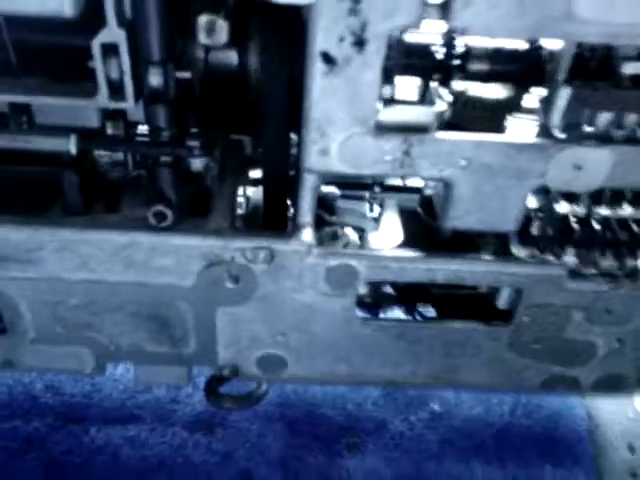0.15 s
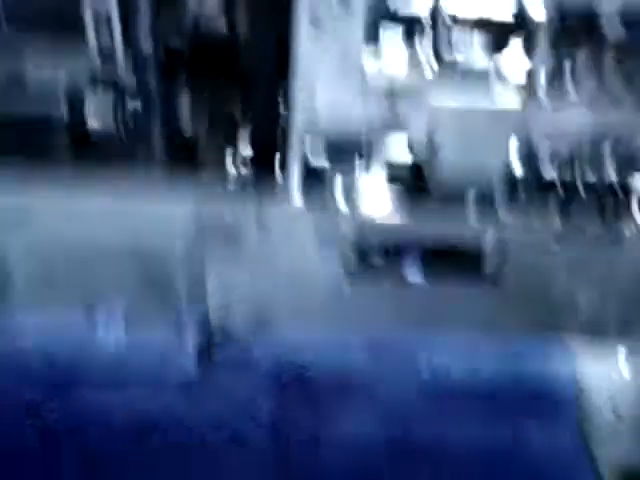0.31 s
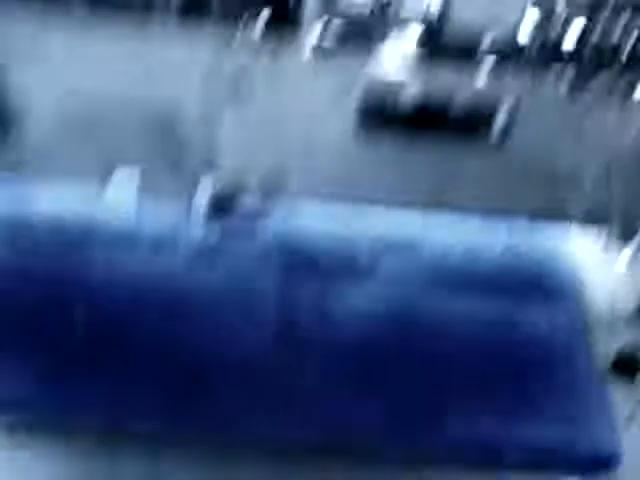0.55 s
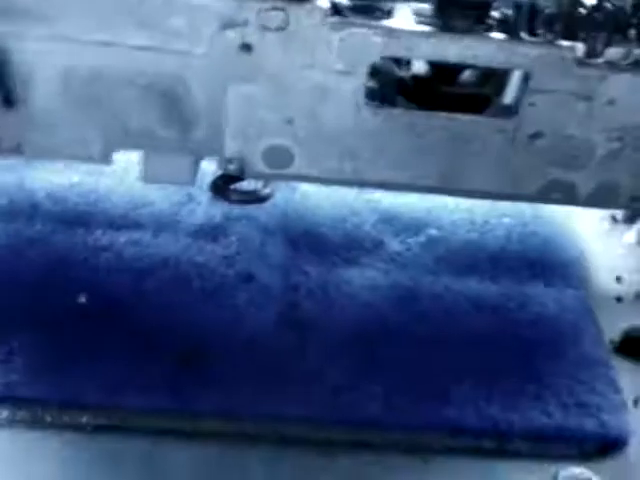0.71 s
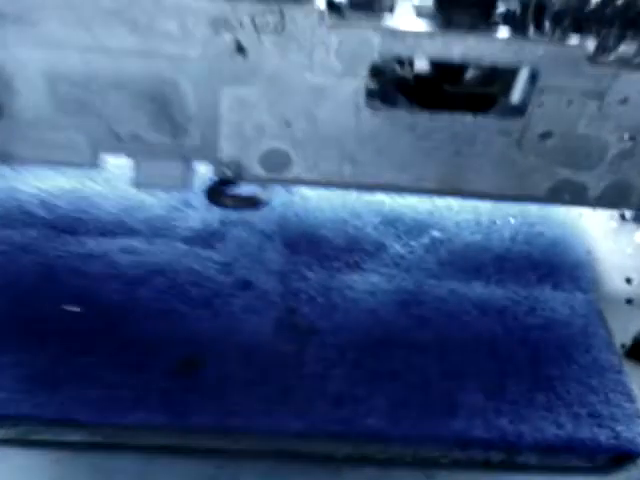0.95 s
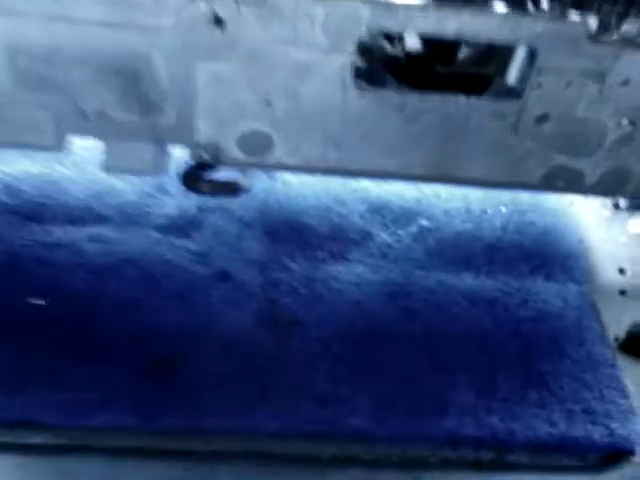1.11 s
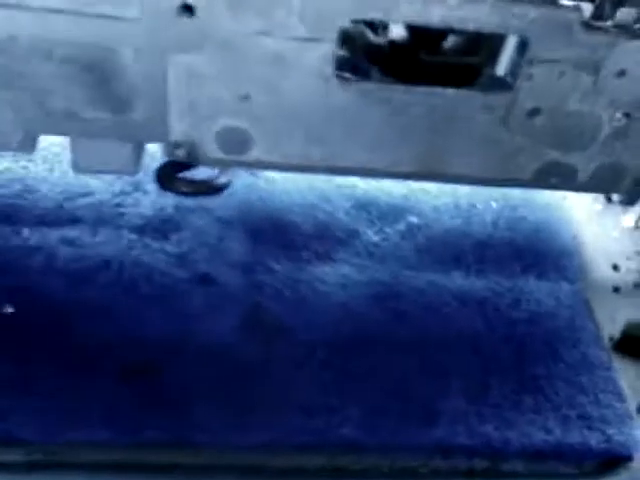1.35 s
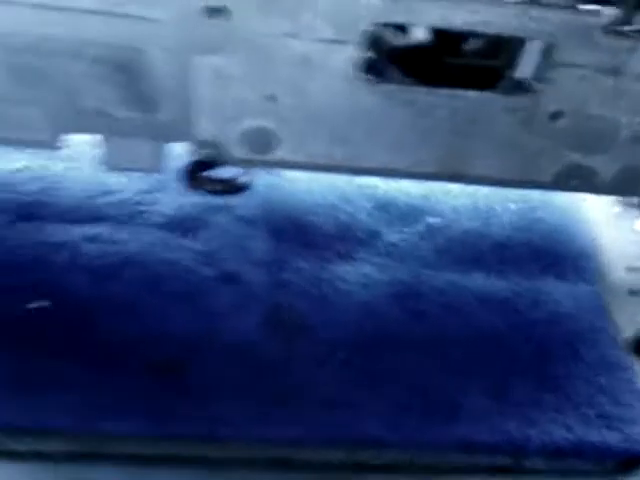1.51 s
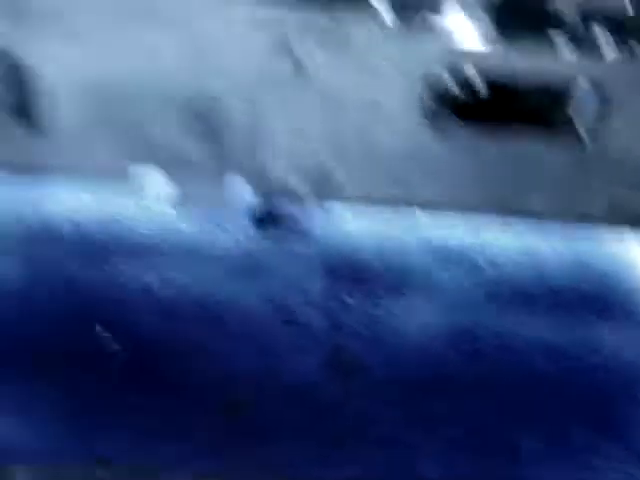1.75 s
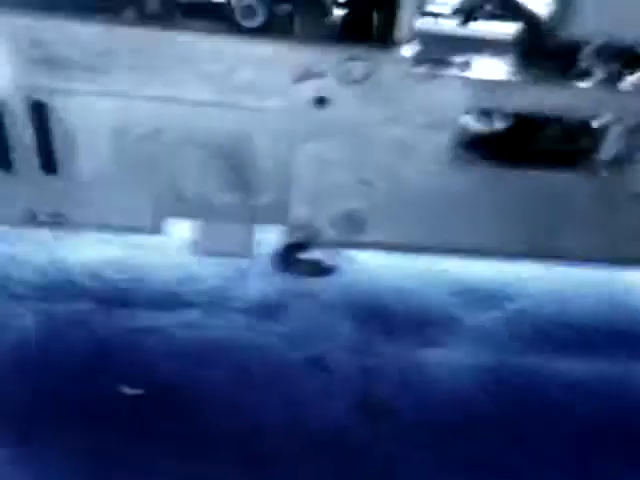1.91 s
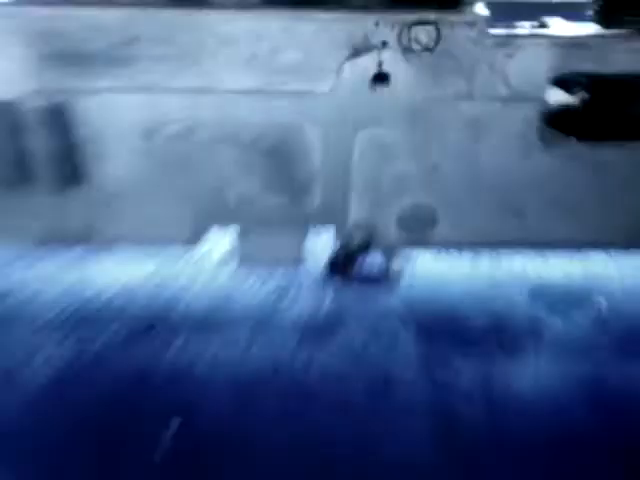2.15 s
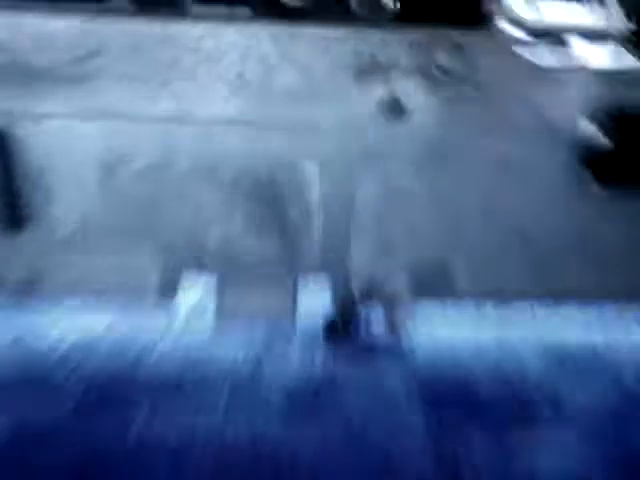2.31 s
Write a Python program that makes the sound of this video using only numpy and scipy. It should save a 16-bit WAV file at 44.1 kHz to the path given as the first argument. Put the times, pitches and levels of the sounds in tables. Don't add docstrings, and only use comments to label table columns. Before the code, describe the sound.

Electric typewriter switched on: a sharp double metal clack, then faint motor hum and light clicks

```python
import sys
import numpy as np
from scipy import signal
from scipy.fft import rfft, irfft, next_fast_len
from scipy.io import wavfile
from scipy.ndimage import map_coordinates

SR = 44100
rng = np.random.default_rng(int(sys.argv[2]) if len(sys.argv) > 2 else 0)


def wav_record(signal):
    frames = np.transpose(np.atleast_2d(signal))
    bounded = np.clip(frames, -1, 1)
    quanta = np.round(bounded * 32767).astype(np.int16)
    wavfile.write(sys.argv[1], SR, quanta)


def gain_from_db(level_db):
    decades = np.asarray(level_db, float) / 20
    return 10 ** decades


N = 105354

# [t/s, level/dB]
RATTLE = [(0, -34.5), (.04, -33.5), (.07, -35), (.085, -41), (.1, -36), (.14, -40.5), (.17, -52),
          (.26, -57.5), (.33, -77)]
# [t/s, level/dB, contact time/s]
BLOWS = [
    (0.0442, -34.5, 0.004),
    (.0475, -34.5, 0.0092),
    (.059, -44, 0.0035),
    (0.1073, -32.5, .004),
    (0.115, -35, 0.0027),
    (.126, -40.5, .004),
]
# [f/Hz, level/dB, t60/s: each fades by 60 dB in about 0.37 of it]
STEEL_TONES = [(312, -4, 0.45), (890, 15.5, 0.14), (1160, -17.5, 0.51), (1352, -12, 0.15), (1550, -4, 0.27),
               (2370, -13.5, 0.17), (2400, -1, 0.033), (2805, -15, 0.16), (2977, -17.5, 0.37),
               (3550, 7.5, 0.15), (3806, -20.5, 0.21), (4640, -13, 0.066), (4930, -7.5, 0.098),
               (6858, -22.5, 0.2)]
# [f/Hz, level per Hz/dB]
RATTLE_COLOUR = [(53, -33.5), (90, -3.5), (244, -6.5), (299, 0.5), (580, -12.5), (1570, 1), (2030, -7.5),
                 (3350, -8), (7400, -13), (9620, -33.5), (16300, -120)]
# [t/s, length/s]
SLIP_TIMES = [(.225, .02), (.428, .01), (.4615, .007), (.474, .022), (1.073, .007), (1.0805, .013),
              (1.1, .01), (1.118, .004),
              (1.2315, .008), (1.24, .008), (1.25, .03), (1.28, .011), (1.33, .005), (1.3355, .005),
              (1.342, .014), (1.362, .03), (1.5905, .006), (1.6, .007), (1.62, .03)]
# [level/dB, brightness/dB per octave]
SLIP_SOUNDS = [(-47.5, -2.5), (-64, -4), (-50, -0.6), (-60, 1), (-55, -4), (-47, 1), (-50.5, -5.5),
               (-51.5, -2), (-41.5, 3), (-40, -0.5), (-56.5, -6), (-54, -1), (-44, 0.5), (-46.5, -4.5),
               (-46, 0), (-58.5, -6.5), (-46.5, 1.5), (-50, 2.5), (-64.5, -2.5)]
# [f/Hz, level per Hz/dB]
SLIP_COLOUR = [(290, -26), (500, 7), (2840, -1.5), (3360, -1), (3850, -2), (4770, -1.5), (5910, -4),
               (7400, -5), (9620, -31), (16300, -120)]
# [t/s, peak level/dB,
# f/Hz, width/Hz]
TICKS = [(.017, -33, 1100, 600), (.031, -26, 3200, 900), (.052, -24, 4600, 900), (0.0548, -28.5, 1600, 600),
         (0.095, -27.5, 3200, 1500), (0.0479, -22.5, 1930, 1500), (.108, -19, 1550, 450),
         (0.1113, -26, 1500, 600), (.1165, -26, 3030, 2500), (.127, -25.5, 1260, 600),
         (0.2116, -43, 2980, 2530), (0.2364, -30.5, 4830, 2940), (.338, -54, 6000, 2500),
         (.437, -53, 3000, 3020), (.452, -56, 6340, 1500), (0.488, -61, 350, 250), (0.7465, -50, 398, 200),
         (0.889, -58.5, 4570, 1300), (.889, -62, 2800, 1500), (1.081, -38.5, 6440, 2500),
         (1.0831, -43.5, 2000, 900), (1.0862, -42.5, 1200, 400), (1.0885, -42.5, 980, 250),
         (1.11, -57.5, 550, 70), (1.089, -43.5, 3000, 700), (1.0905, -41, 4100, 1200),
         (1.093, -44, 1300, 900), (1.119, -50, 3800, 900), (1.161, -58, 6300, 1500),
         (1.2408, -33.5, 4870, 1200), (1.2415, -37, 700, 1200), (1.2472, -39.5, 2500, 3500),
         (1.3357, -33.5, 810, 1300), (1.3625, -48.5, 900, 500), (1.3413, -29, 5130, 3000),
         (1.431, -52.5, 6600, 1100), (1.4515, -50, 2500, 5000), (1.538, -68, 6600, 1070),
         (1.562, -66, 4000, 3000), (1.596, -43, 1280, 900), (1.84, -60.5, 4800, 3500),
         (1.866, -52, 2500, 4000), (1.987, -64.5, 6000, 1800)]
THUD_TIMES = [0, .048, .05, .055, .108, .23, .486, .5, .58, .746, 1.1, 1.14, 1.2455, 1.2505, 1.281, 1.315,
              1.34, 1.37, 1.398, 1.445, 1.585, 1.602]
# [peak level/dB, f/Hz, t60/s, pitch sag/share of f]
THUD_SOUNDS = [(-38.5, 165, 0.22, .2), (-40, 161, 0.49, 0.19), (-40, 178, 0.22, .2), (-50, 120, 0.45, 0.16),
               (-39, 308, 0.27, 0.023), (-51, 148, 0.52, .2), (-47, 270, 0.051, 0.31),
               (-54.5, 170, .12, .1), (-63, 310, .1, .2), (-51.5, 290, .15, .35), (-68, 54, 0.88, .2),
               (-57, 265, .25, .05), (-37, 125, 0.23, 0.64), (-45, 270, 0.22, 0.12), (-48.5, 190, .1, .2),
               (-46.5, 215, 0.16, 0.042), (-53.5, 370, 0.25, .02), (-52.5, 196, .12, .1),
               (-49, 175, 0.16, 0.041), (-52, 190, 0.11, .1), (-53.5, 280, .1, .02), (-47, 133, 0.073, .2)]
# [f/Hz, level/dB, t60/s]
LEVER_TONES = [(1080, -6, .18), (1780, -1, .2), (2137, -0.5, 0.35), (2482, -3, 0.43), (3350, -1, .25),
               (4640, -3, .1), (5265, -5, .1), (6700, 5, .12)]
# [t/s, level/dB]
LEVER_STRIKES = [
    (1.2405, -57),
    (1.3412, -67.5),
    (1.088, -67),
]
# [t/s, level/dB]
MOTOR_NEARNESS = [(0.3, -69), (1.28, -69.5), (1.58, -70.5), (2.01, -70), (2.23, -70.5), (2.39, -72.5)]
# [t/s, level/dB]
HUM_SWELL = [(0.2, -66), (0.23, -56.5), (0.36, -66), (0.4, -59.5), (0.49, -66), (0.52, -55.5),
             (0.63, -65.5), (0.78, -57.5), (0.8, -63), (1.06, -62), (1.2, -55.5), (1.24, -66), (1.29, -53),
             (1.52, -68.5), (1.61, -57), (1.69, -62.5), (2.36, -61), (2.39, -64)]
# [f/Hz, rms level/dB]
WHINE_TONES = [(279.9, -75), (602.9, -78), (877.5, -82.5), (1093, -74), (1174, -71), (1250, -73.5),
               (1295, -77), (1362, -92.5), (1523, -83.5), (2008, -90)]
# [f/Hz, width/Hz, level/dB]
HOUSING = [(296, 193, 2.5), (582, 43, -8), (800, 66, -4.5), (1256, 366, -5), (2016, 380, -7.5)]
# [f/Hz, level per Hz/dB]
AIR_COLOUR = [(15, -75.5), (25, -37), (95, -21), (123, -12), (146, -13.5), (319, -24.5), (607, -28),
              (1180, -29.5), (1610, -30.5), (7400, -51), (9620, -98.5), (16300, -120)]
# [t/s, level/dB]
RUSTLE = [(1.05, -95), (1.12, -73.5), (1.4, -92), (1.7, -82.5), (2.05, -92), (2.22, -77.5), (2.39, -81.5)]
# [f/Hz, level per Hz/dB]
CLOTH_COLOUR = [(500, -20), (1800, -10), (3200, 0), (4800, -10), (7400, -26)]
# [f/Hz, t60/s]
ROOM_FADE = [(200, 0.65), (1500, 0.073), (4000, 0.28), (7000, 0.27)]
# [f/Hz, level/dB]
CAMERA_COLOUR = [(20, -2), (70, -0.5), (5000, -2), (6000, -6.5), (6900, 0), (7400, -5.5), (7700, -16.5),
                 (8000, -42), (8250, -23.5), (8600, -9.5), (9300, -60.5), (10000, -110)]


def unit(x):
    return x / np.sqrt(np.mean(x ** 2) + 1e-20)


def along(points, hz):
    f, v = np.transpose(points)
    return np.interp(np.log(hz + 1), np.log(f + 1), v)


def curve(rows):
    s, v = np.transpose(rows)
    return np.interp(np.arange(N) / SR, s, v)


def wobble(rate):
    knots = rng.standard_normal(int(N * rate / SR) + 4)
    return map_coordinates(knots, [np.arange(N) * rate / SR])


def filtered(x, response):
    m = next_fast_len(len(x) + 8192)
    return irfft(rfft(x, m) * response(np.fft.rfftfreq(m, 1 / SR)), m)[:len(x)]


def coloured_noise(colour):
    return unit(filtered(rng.standard_normal(N), lambda f: gain_from_db(along(colour, f))))


def peak(f, hz, width):
    return 1j * f * width / (hz * hz - f * f + 1j * f * width)


def chatter(size, rate, spike_db):
    strengths = gain_from_db(spike_db * np.clip(rng.standard_normal(size + 1), -2, 2))
    contact = (np.arange(size) * rate / SR).astype(int)
    return unit(strengths[contact] * rng.standard_normal(size))


def add(track, s, sound):
    part = track[round(s * SR):][:len(sound)]
    part += sound[:len(part)]


def room_air():
    return gain_from_db(-66.5) * coloured_noise(AIR_COLOUR)


def sleeve_rustle():
    level_db = curve(RUSTLE) + 1.5 * wobble(25)
    return gain_from_db(level_db) * coloured_noise(CLOTH_COLOUR)


def room_echo(x):
    out = np.zeros(N)
    step = SR // 10
    for start in range(0, N, step):
        hz, t, z = signal.stft(rng.standard_normal(SR // 2), SR, nperseg=256)
        fade = gain_from_db(-60 * t / along(ROOM_FADE, hz)[:, None])
        tail = signal.istft(z * fade, SR, nperseg=256)[1]
        echo = signal.fftconvolve(x[start:start + step], tail / np.linalg.norm(tail))
        add(out, start / SR + .004, echo)
    return out


def case_thuds():
    attack_s, sag_s, roughness = .003, .035, .15
    out, t = np.zeros(N), np.arange(SR // 2) / SR
    for s, (db, hz, t60, sag) in zip(THUD_TIMES, THUD_SOUNDS):
        pitch = hz * (1 + sag * np.exp(-t / sag_s))
        tone = np.sin(2 * np.pi * np.cumsum(pitch) / SR)
        noise = rng.standard_normal(len(t))
        rough = unit(filtered(noise, lambda f: peak(f, 1.5 * hz, .8 * hz) ** 2))
        envelope = gain_from_db(db - 60 * t / t60) * (1 - np.exp(-t / attack_s))
        add(out, s, envelope * (tone + roughness * rough))
    return out


def lever():
    out, t = np.zeros(N), np.arange(SR // 2) / SR
    for s, db in LEVER_STRIKES:
        for hz, level, t60 in LEVER_TONES:
            envelope = gain_from_db(db + level + rng.normal(0, 1.5) - 60 * t / t60)
            add(out, s, envelope * np.sin(2 * np.pi * hz * t))
    return out


def ticks():
    grit_s, grit_level = .0015, .2
    out, t = np.zeros(N), np.arange(SR // 20) / SR
    for s, db, hz, width in TICKS:
        grit = grit_level * rng.standard_normal(len(t)) * np.exp(-t / grit_s)
        crack = (t == 0) + grit
        sound = filtered(crack, lambda f: peak(f, hz, width) ** 2)
        add(out, s, gain_from_db(db) * sound / np.abs(sound).max())
    return out


def slips():
    release_s, sag_db = .004, 5
    out, t = np.zeros(N), np.arange(SR // 10) / SR
    for (s, length), (db, bright) in zip(SLIP_TIMES, SLIP_SOUNDS):
        def colour(f):
            tilt = ((f + 50) / 3000) ** (bright / 6)
            low_cut = (f / (f + 700)) ** 2
            return gain_from_db(along(SLIP_COLOUR, f)) * tilt * low_cut

        sound = filtered(chatter(len(t), 1500, 1.5), colour)
        sound /= np.std(sound[t < length])
        release = np.exp(-np.maximum(t - length, 0) / release_s)
        add(out, s, gain_from_db(db - sag_db * t / length) * sound * release)
    return out


def motor():
    hum_hz, hum_drift_hz = 119.9, 0.59
    whine_width_hz, whine_sway_db = 22, 2.5
    whirr_db, whirr_pulse, whirr_patchy_db = -65.5, 0.28, 1
    pulse = np.sin(2 * np.pi * np.cumsum(hum_hz + hum_drift_hz * wobble(4.5)) / SR)
    hum = gain_from_db(curve(HUM_SWELL) + 3.5) * pulse

    whine = np.zeros(N)
    for hz, db in WHINE_TONES:
        level = gain_from_db(db + whine_sway_db * wobble(5.96))
        whine += level * unit(filtered(rng.standard_normal(N), lambda f: peak(f, hz, whine_width_hz)))

    def housing(f):
        return sum((-1) ** k * gain_from_db(db) * peak(f, hz, w) ** 2 for k, (hz, w, db) in enumerate(HOUSING))

    bearing = rng.standard_normal(N) * (1 + whirr_pulse * pulse) * gain_from_db(whirr_patchy_db * wobble(18))
    whirr = gain_from_db(whirr_db) * unit(filtered(bearing, housing))
    near_db = curve(MOTOR_NEARNESS)
    return hum + gain_from_db(near_db - near_db.mean()) * (whine + whirr)


def start_up():
    rise_s, release_s = .001, .004
    t = np.arange(N) / SR

    def steel(f):
        return sum((-1) ** k * gain_from_db(db) * peak(f, hz, 6 / t60) * np.sqrt(t60)
                   for k, (hz, db, t60) in enumerate(STEEL_TONES))

    force = chatter(N, 900, 1.2)
    knocking = unit(filtered(force, lambda f: gain_from_db(along(RATTLE_COLOUR, f) - 40 * (f < 80))))
    push = gain_from_db(curve(RATTLE) - 2) * (t < RATTLE[-1][0])
    for s, db, contact in BLOWS:
        rise = np.clip((t - s) / rise_s, 0, 1)
        release = np.exp(-np.maximum(t - s - contact, 0) / release_s)
        push = push + gain_from_db(db) * rise * release
    steady_ring = np.std(filtered(force, steel))
    ring = filtered(push * force, steel) / steady_ring
    return push * knocking + gain_from_db(-9) * ring


def scene():
    hits = start_up() + slips() + ticks()
    echo = gain_from_db(-13.5) * room_echo(hits)
    return (hits + echo + motor() + lever() + case_thuds() + sleeve_rustle() + room_air())[None]


def low_pass(x):
    return signal.sosfilt(signal.butter(12, 8820, fs=SR, output="sos"), x)


def record(dry):
    mix = filtered(dry[0], lambda f: gain_from_db(along(CAMERA_COLOUR, f)))[None]
    return low_pass(mix)


dry = scene()
out = record(dry)
wav_record(out)
```